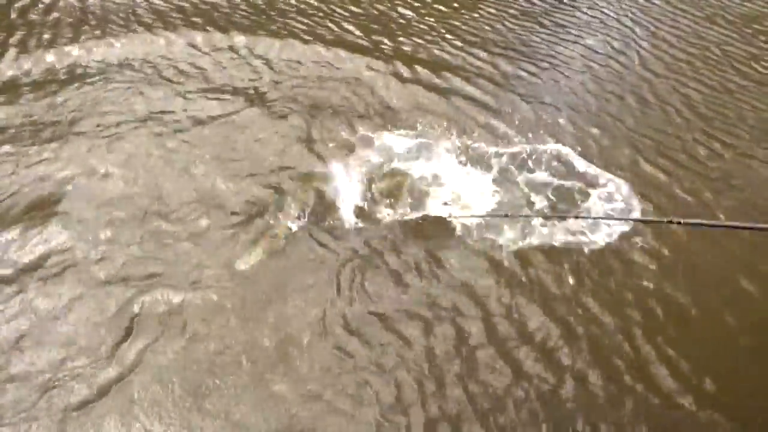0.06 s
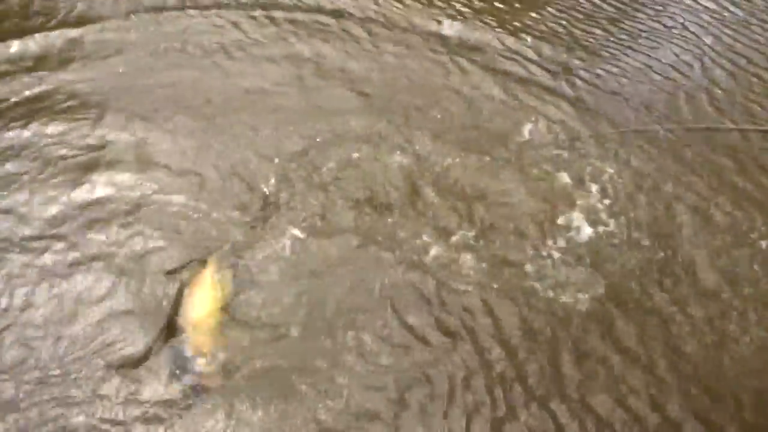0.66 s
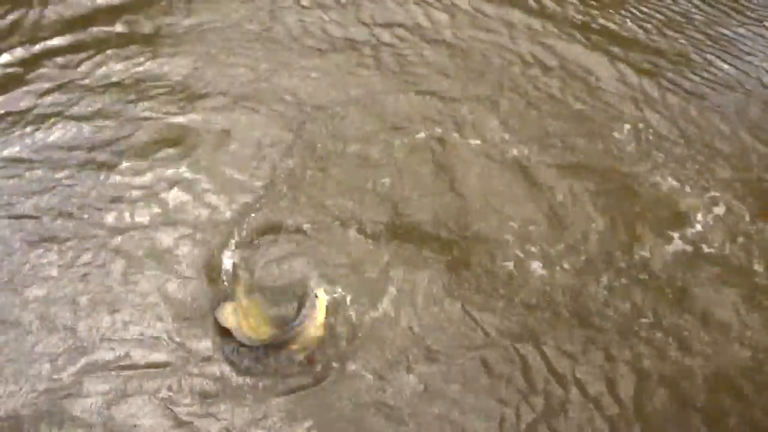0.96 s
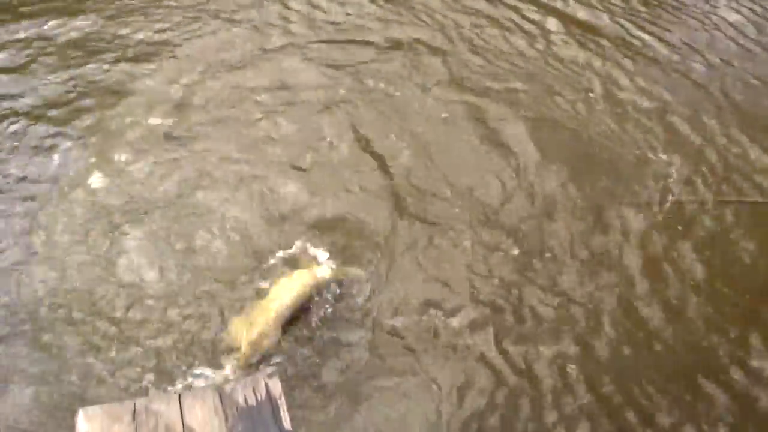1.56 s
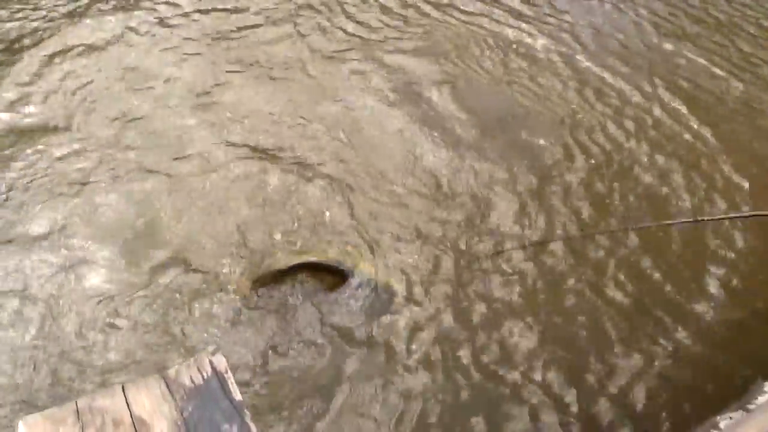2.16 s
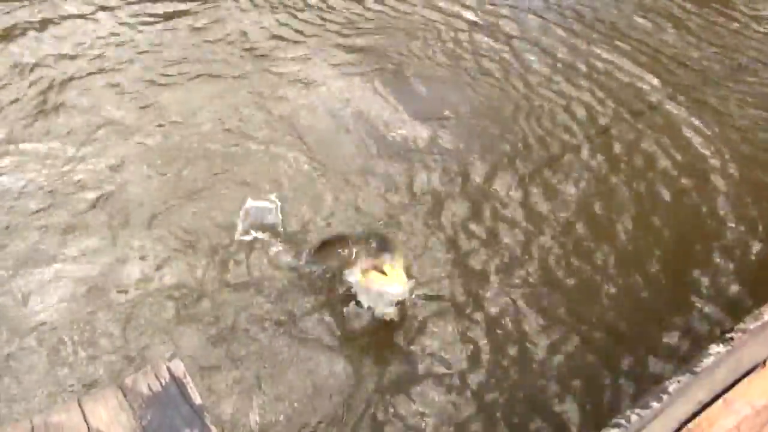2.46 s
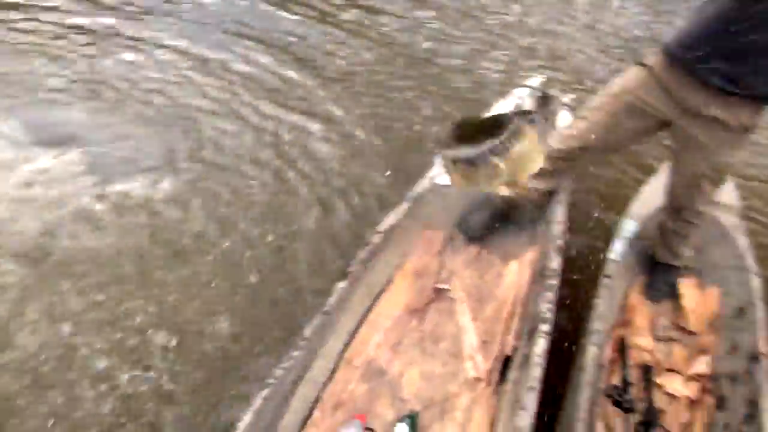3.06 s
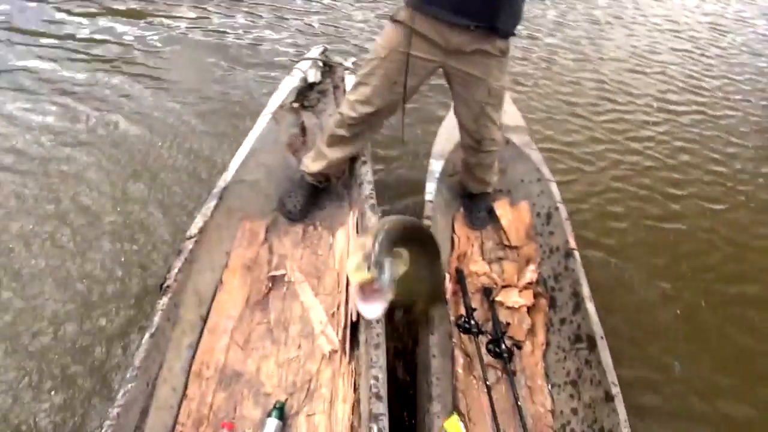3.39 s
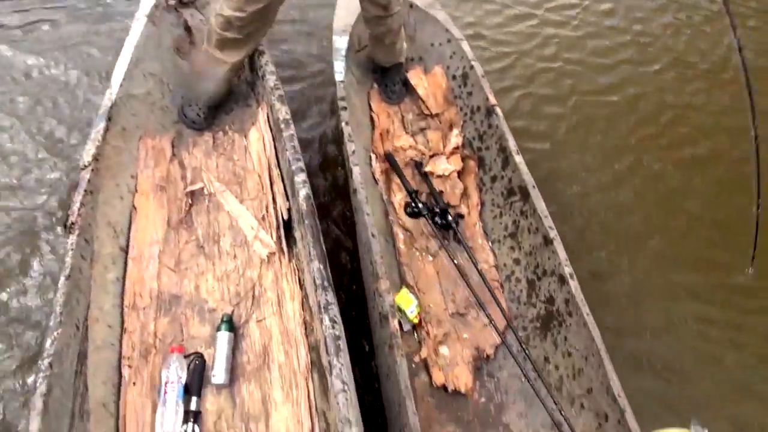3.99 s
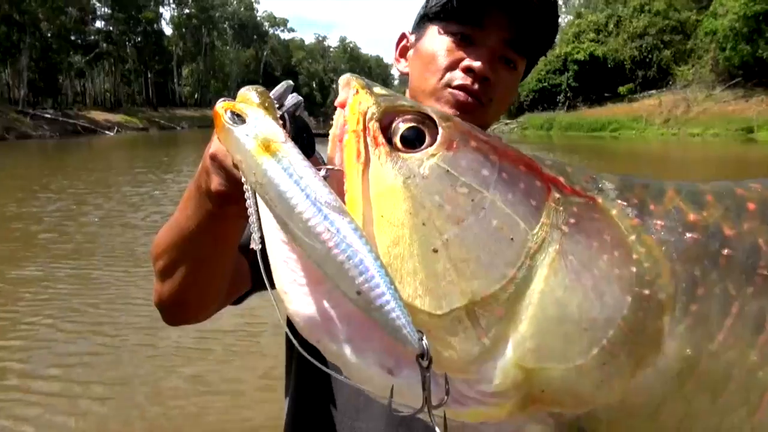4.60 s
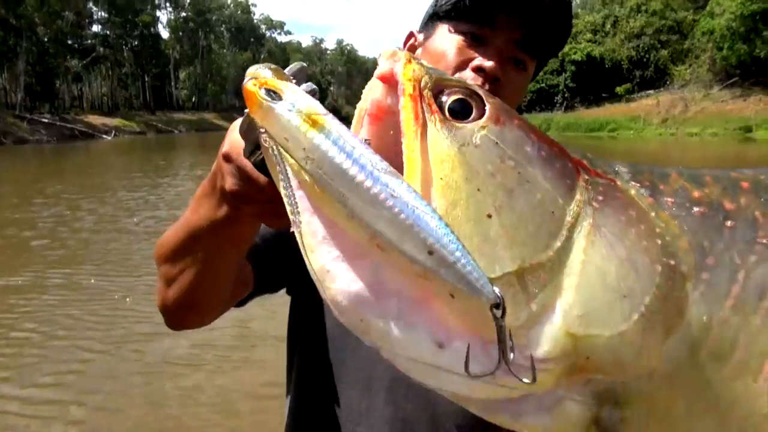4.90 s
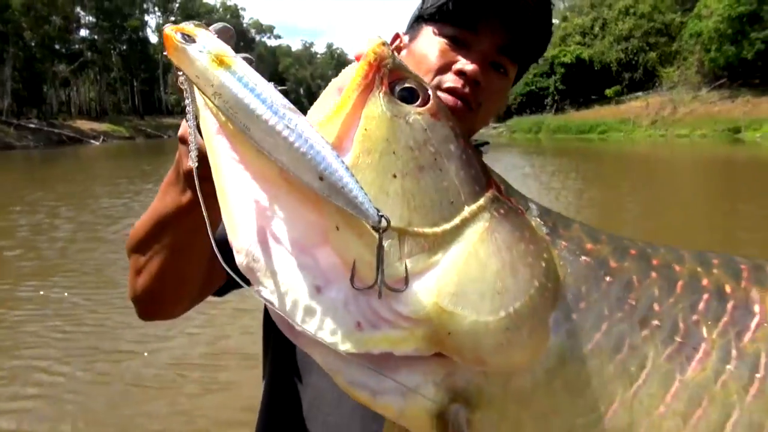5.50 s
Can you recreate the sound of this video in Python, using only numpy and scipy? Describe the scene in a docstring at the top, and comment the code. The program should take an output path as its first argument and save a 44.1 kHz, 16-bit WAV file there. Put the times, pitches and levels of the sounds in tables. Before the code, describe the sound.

A hooked fish thrashes at the surface of a river, close by, in uneven bursts of splashing, gurgling bubbles and pattering spray. Swung over two wooden canoes, it flaps quickly, flinging drops that smack sharply, and thuds against a hull. The sound then cuts abruptly to a very quiet river bank with a soft plop, two faint wet ticks and one distant bird chirp.

```python
"""On a river, beside two wooden canoes: a hooked fish thrashes at the surface. Its tail churns the water
into ringing bubbles and spray, and folds under pockets of air that gulp. Swung over the boats, it flaps,
flings drops that smack down nearby, and thuds into a hull, ringing the planks.
Then the sound cuts to a still river bank with one far bird chirp."""
import sys
import numpy as np
from scipy import signal
from scipy.fft import rfft, irfft
from scipy.io import wavfile

SR = 44100
rng = np.random.default_rng(int(sys.argv[2]) if len(sys.argv) > 2 else 0)


def dump_mix(stems):
    """Bounce the given channels to the path in sys.argv[1] as a 16-bit WAV at rate SR."""
    frames = np.atleast_2d(stems).T  # one column per channel
    limited = np.clip(frames, -1, 1)  # hard clip at full scale
    pcm = np.round(limited * 32767).astype(np.int16)
    wavfile.write(sys.argv[1], SR, pcm)


N = 253530
T = np.arange(N) / SR
AIRBORNE_S, CUT_S, END_S = 3.0, 4.514, 5.595   # fish lifted out, cut to the bank, silence
LEAD_S = .03   # water starts to squeeze out this long before a smack


# Tail strokes breaking the surface: t/s, level/dB, length/s, brightness/dB, slop send/dB
TAIL_STROKES = [(.02, -32, 0.65, -2, -14.5), (0.555, -42, 0.1, -2.5, -9), (0.883, -48.5, 0.31, -0.5, -9.5),
                (1.04, -42.5, 0.13, 3, -17), (1.14, -45, 0.2, 0.5, -6.5), (1.273, -39, 0.18, 3, -18),
                (1.47, -39.5, 0.24, -1, -5), (1.661, -43, 0.3, -4, -8), (1.908, -51.5, 0.19, -4, -19),
                (2.103, -54, 0.19, -3.5, -4), (2.45, -40.5, 0.097, 1, -14.5), (2.53, -39.5, 0.18, -4, -30),
                (2.681, -38.5, 0.27, -2, -12.5), (2.864, -36, .22, 1, -19.5)]

def strokes(offsets_db, lingers=1):
    """Envelope of water thrown up by the tail: it opens fast and falls back slowly at first."""
    return surges(TAIL_STROKES, offsets_db, lingers, rise_db_per_s=340, fall_shape=2.79)


# Wet flaps over the boats: t/s, level/dB, length/s, brightness/dB, hull rumble send/dB, slop send/dB (the water
# heaving as the canoes rock)
FISH_FLAPS = [(3.046, -37.5, 0.14, 3, -20, -12.5), (3.19, -38.5, 0.12, 7, -14.5, -17.5),
              (3.276, -44, 0.1, -1, -24, -5.5), (3.384, -43.5, 0.16, 0.5, -15, -11.5),
              (3.512, -35.5, .125, 1, -14, -27), (3.671, -38.5, 0.045, -1, -12.5, -15),
              (3.819, -43, 0.078, 0, -6.5, -28), (3.929, -32, .1, -1.5, -9.5, -27),
              (4.009, -41.5, 0.28, 1.5, -3, -15), (4.265, -39, 0.22, 2, -5, -27),
              (4.438, -32.5, 0.051, -3, -4.5, -20), (4.499, -32, 0.05, 1, -6.5, -25.5)]

def flaps(offsets_db, lingers=1):
    """Envelope of the fish flapping in the air: each flap holds its level, then stops short."""
    return surges(FISH_FLAPS, offsets_db, lingers, rise_db_per_s=621.5, fall_shape=4.1)


def agitation_db(register, lingers=1):
    """Level of all the moving water; brightness dips a negative register and lifts a positive one."""
    thrown = strokes([register * row[3] for row in TAIL_STROKES], lingers)
    shaken = flaps([register * row[3] for row in FISH_FLAPS], lingers)
    rest = from_db(np.where(T < AIRBORNE_S, -57, -51))   # lapping, then dripping
    return 10 * np.log10(thrown ** 2 + shaken ** 2 + rest ** 2)


# Fader on the gurgle's and splash's ringing bubbles, low once the fish is out: t/s, level/dB
BUBBLE_FADER = [(.5, -8), (.8, 1.5), (2.3, -0.5), (2.75, -3.5), (3.3, -8), (3.9, -18)]
# EQ curves of big bubbles, small bubbles and falling drops: f/Hz, level/dB
GURGLE_EQ = [(280, -12.5), (400, -16), (550, 0), (750, -5.5), (1100, -1.5), (1500, -4.5), (2100, -20)]
SPLASH_EQ = [(1000, -20), (1500, -3), (2200, 6), (3300, 5), (4400, -11), (6000, -20.5)]
SPRAY_EQ = [(3300, -19.5), (4600, 0.5), (6000, 1.5), (7500, -0.5), (9000, -8.5), (12000, -15), (15500, -36)]

def churn():
    """Broken water: big bubbles gurgle, small ones fizz, and falling drops patter on top."""
    gurgle_db = agitation_db(register=-1.2, lingers=1.038) - .74
    splash_db = agitation_db(register=0) + .35
    spray_db = agitation_db(register=.87) - .48
    bubbling = from_db(np.interp(T, *np.transpose(BUBBLE_FADER)))
    gurgle = from_db(-1) * patter(GURGLE_EQ, per_s=200, spread_db=3, smooth_db=-5.5, patchy_db=4.5)
    gurgle += bubbling * from_db(-4.5) * fizz(494, 1590, cycles=35, glide=.16, spread_db=9, count=800)
    splash = from_db(-2) * patter(SPLASH_EQ, per_s=220, spread_db=3.5, smooth_db=-.5, patchy_db=1.5)
    splash += bubbling * from_db(-1) * fizz(1494, 4260, cycles=33, glide=.09, spread_db=18.5, count=1100)
    spray = from_db(-.5) * patter(SPRAY_EQ, per_s=260, spread_db=-.5, smooth_db=-6, patchy_db=2.5)
    spray += from_db(-15.5) * fizz(4800, 9140, cycles=230, glide=.04, spread_db=20.5, count=1000)
    # each larger drop ticks across the whole treble at once
    ticks = butter(grains(per_s=290, spread_db=2), [1500, 7500], "band")
    drops = from_db((splash_db + spray_db) / 2 - 6) * rms_one(butter(ticks, 7900, "low"))
    # spray comes in clumps that start at once and thin out
    onsets = abs(grains(per_s=110, spread_db=3))
    clumps = rms_one(signal.lfilter([1], [1, -np.exp(-1 / (.007 * SR))], onsets))
    top_end = from_db(splash_db) * splash + from_db(spray_db) * spray
    return from_db(gurgle_db) * gurgle + rms_one(1.8 + clumps) * top_end + drops


def flung_drops():
    """Each stroke or flap throws a drop that lands while it lasts; rows as in WET_SMACKS."""
    drops = []
    for s, db, length_s, *_ in TAIL_STROKES + FISH_FLAPS:
        lands_s = s + .84 * length_s * rng.random()
        energy_db = db + 22 + rng.normal(0, 6)
        hz = 5600 * 2 ** rng.uniform(-.3, .3)
        drops.append((lands_s, energy_db, hz, -1.5))
    return drops


# Featured smacks of fish and flung water: t/s, energy/dB, centre f/Hz, spatter send/dB
WET_SMACKS = [(0.9629, -11.5, 5440, -6.5), (1.2884, -9.5, 3360, -9), (1.316, 4.5, 3300, 1),
              (1.478, -8.5, 5550, -8), (1.5147, -5.5, 3640, -4), (2.1223, -14.5, 5400, -6),
              (2.4406, -11.5, 4300, 2), (2.8157, -7, 6200, 0), (2.8944, -7.5, 2740, -1),
              (2.9399, -7, 5400, 5.5), (3.018, -7, 4900, -6.5), (3.0338, -0.5, 6950, 2),
              (3.0917, 4, 3100, -6), (3.1787, 3.5, 7050, -4), (3.202, -0.5, 7000, -5),
              (3.2649, -5, 5100, 8.5), (3.2843, -3, 7000, 2.5), (3.323, -4, 6860, -4),
              (3.3506, -2, 7700, -20), (3.3908, 2.5, 6800, -2), (3.4197, -8, 4670, 1),
              (3.4565, -1, 7220, -1.5), (3.5022, 1, 6170, 3.5), (3.607, -7, 4970, 0),
              (3.637, -15.5, 5300, 6), (3.6725, 4, 6400, -10), (3.9192, -6, 3450, -5),
              (3.9444, 0, 5260, 1.5), (3.984, -12, 4930, 3), (4.1684, -3.5, 6400, -2.5),
              (4.358, -11, 5350, -1), (4.372, -5.5, 6290, 7), (4.3849, 4.5, 6600, -5),
              (4.457, -6.5, 6970, 4), (4.4722, 3.5, 3300, -2)]

def smacks():
    """A sharp crack, with water squeezed out just before it, then a rebound and spatter."""
    out = np.zeros(N)
    for s, db, hz, spatter_db in WET_SMACKS + flung_drops():
        shatter = unit_energy(burst(before_db=-30, decay_s=.001, spread_db=4))
        crack = wet_colour(signal.unit_impulse(SR // 8, int(LEAD_S * SR)) + .5 * shatter, hz)
        spatter = wet_colour(burst(before_db=-12, decay_s=.0055, spread_db=6), hz)
        add(out, s - LEAD_S, from_db(db) * (crack + from_db(spatter_db) * spatter))
        rebound_s = s + .0059 * rng.uniform(.8, 1.2)
        add(out, rebound_s - LEAD_S, from_db(db + spatter_db - 6.5) * wet_colour(shatter, hz))
    return out


# Large air pockets: t/s, f/Hz, relative level/dB, t60/s, glide/(share of f per s)
AIR_POCKETS = [(.011, 564, -16, 0.014, 25), (.057, 900, -16.5, 0.028, 8), (.061, 465, -16.5, 0.03, -7),
               (.145, 940, -16.5, 0.063, 2.5), (0.513, 503, -19, 0.011, 14), (.889, 1970, -35, 0.053, 24),
               (.981, 1205, -26.5, 0.025, -10), (1.068, 1360, -20.5, 0.031, 11.5),
               (1.091, 489, -39.5, 0.24, 2.5), (1.477, 1170, -23, 0.016, 3), (1.513, 585, -20, 0.043, -1),
               (1.515, 177, -34, 0.087, -4.5), (1.551, 1100, -20.5, 0.013, -1),
               (1.691, 251, -31.5, 0.1, -2.5), (1.711, 498, -30, 0.067, 6.5),
               (1.744, 236.5, -38.5, 0.25, 5), (1.872, 575, -35.5, 0.066, -1.5),
               (1.928, 569, -30, 0.1, 9.5), (2.042, 584, -43, 0.14, 5.5), (2.486, 614, -29.5, 0.045, -1),
               (2.546, 910, -29.5, 0.091, 0.5), (2.595, 560, -26, 0.036, -4), (2.652, 1130, -22, 0.017, 2),
               (2.837, 536, -31, 0.082, 19.5)]

def gulps():
    """The fish folds large pockets of air under the surface, and each rings with a bending pitch."""
    out = np.zeros(N)
    for s, hz, db, t60, glide in AIR_POCKETS:
        add(out, s, from_db(db + 4) * ping(hz, t60, glide, onset_s=.0011))
    return out


# Blows on the hull: t/s, relative level/dB, centre f/Hz, contact/s
HULL_BLOWS = [(2.733, -34, 190, .0066), (3.092, -11.5, 1010, 0.0053), (3.098, -20, 1460, 0.0038),
              (3.199, -35.5, 260, .004), (3.499, -22.5, 1410, .015), (3.549, -21, 905, .01),
              (3.667, -28.5, 1150, .0052), (3.834, -29, 404, .019), (4.077, -32, 240, 0.0063),
              (4.096, -26.5, 143, .0085), (4.433, -15.5, 1780, .003), (4.4402, -8, 857, .0045),
              (4.445, -10.5, 334, .003), (4.492, -25, 1497, 0.0036)]
# Resonances of the wooden hull: f/Hz, relative level/dB, t60/s
HULL_MODES = [(145, -15.5, 0.17), (250, 0, 0.051), (313, -1.5, 0.1), (541.5, -5.5, .035), (720, 3, 0.072),
              (860, -17.5, 0.044), (1023, -4, .03), (1124, 1, .04), (1520, -11, .025), (1810, 7, 0.024),
              (2450, -6, 0.024), (2880, 2.5, 0.078)]

def hull():
    """Blows ring the planks, most of all near each blow's centre pitch; flaps make them rumble."""
    knocks = np.zeros(N)
    t = T[:SR // 5]
    for s, db, centre_hz, contact_s in HULL_BLOWS:
        push = np.exp(-t / contact_s) * rng.standard_normal(len(t))
        thud = unit_energy(butter(push, [centre_hz / 3, centre_hz * 2.7], "band"))
        add(knocks, s, from_db(db + 18.5) * thud)
        for k, (hz, mode_db, t60) in enumerate(HULL_MODES):
            reach_db = mode_db - 4 * np.log2(hz / centre_hz) ** 2 - 5.5 + rng.normal(0, 1.5)
            add(knocks, s, from_db(db + reach_db) * (-1) ** k * ping(hz, t60, 0, onset_s=contact_s / 4))
    boom = 0
    for hz, mode_db, t60 in HULL_MODES:
        tilt_db = -7 * np.log2(hz / HULL_MODES[0][0])
        boom += from_db(mode_db + tilt_db) * ring(grains(per_s=260, spread_db=-2.5), hz, t60)
    rumble = flaps([row[4] for row in FISH_FLAPS]) * from_db(.5) * rms_one(boom)
    return butter(knocks + rumble, 115, "high", order=3)   # thin planks radiate little bass


# EQ curve of the water's low end: f/Hz, level/dB
SLOP_EQ = [(25, -13.5), (45, -2), (70, 0.5), (130, 0), (220, -4.5), (330, -9.5), (500, -24.5)]

def slop():
    """The low heave of the water, swelling with each stroke and as the canoes rock, and outlasting it."""
    low_end = patter(SLOP_EQ, per_s=60, spread_db=3, smooth_db=-1, patchy_db=2)
    pushed = strokes([row[4] for row in TAIL_STROKES], lingers=1.4)
    rocked = flaps([row[5] for row in FISH_FLAPS], lingers=1.4)
    lapping = from_db(-67)
    return np.sqrt(pushed ** 2 + rocked ** 2 + lapping ** 2) * low_end


def bird():
    """One far, falling chirp and its echo off the trees."""
    pitch_hz = np.interp(T, [4.915, 4.955], [3400, 2200]) * (1 + .06 * drift(239))
    swell = np.interp(T, [4.912, 4.922, 4.96], [0, 1, 0])
    chirp = from_db(-62.5) * swell * np.sin(2 * np.pi * np.cumsum(pitch_hz) / SR)
    add(chirp, .07, from_db(-11) * chirp)
    return chirp


# EQ curve of the air over the river: f/Hz, level/dB
AIR_EQ = [(18, -41.5), (30, -5), (239, 0), (273, -3.5), (355, -3), (415, -1), (540, -8), (760, -10),
          (1100, -7), (3220, -11.5), (3580, -11), (13000, -18.5), (16000, -33.5)]

def bank():
    """A bed of still air with one soft plop and two faint wet ticks."""
    white = rfft(rng.standard_normal(N))
    hz = np.maximum(np.arange(len(white)) * SR / N, 1)
    out = from_db(-69.5) * rms_one(irfft(white * from_db(at_hz(AIR_EQ, hz)), N))
    add(out, 4.552, from_db(-46.5) * ping(425, t60=.039, glide=0, onset_s=.00079))
    for s, db, tick_hz in [(4.954, -41, 6400), (5.115, -46, 4180)]:
        tick = wet_colour(burst(before_db=-20, decay_s=.0018, spread_db=5), tick_hz)
        add(out, s - LEAD_S, from_db(db) * tick)
    return out


def surges(rows, offsets_db, lingers, rise_db_per_s, fall_shape):
    """Joint envelope of movements: each swells, then is 20 dB down after `lingers` times its length."""
    t, power = T[::32], 1e-12
    for (s, db, length_s, *_), offset_db in zip(rows, offsets_db):
        swell_db = rise_db_per_s * np.minimum(t - s, 0)
        fall_db = 20 * (np.maximum(t - s, 0) / (length_s * lingers)) ** fall_shape
        power += from_db(db + offset_db + swell_db - fall_db) ** 2
    return np.interp(T, t, np.sqrt(power))


def patter(eq, per_s, spread_db, smooth_db, patchy_db):
    """Roughly third-octave bands, each rung by its own drops over a blur of finer ones; rms 1."""
    out, low, high = 0, eq[0][0], eq[-1][0]
    edges = np.geomspace(low, high, int(3 * np.log2(high / low)) + 2)
    for a, b in zip(edges, edges[1:]):
        drive = grains(per_s, spread_db) + from_db(smooth_db) * rng.standard_normal(N)
        band_db = at_hz(eq, np.sqrt(a * b)) + patchy_db * drift(19)
        out += butter(drive, [a, b], "band") * from_db(band_db)
    return rms_one(out)


def fizz(low_hz, high_hz, cycles, glide, spread_db, count):
    """A swarm of ringing bubbles, each climbing in pitch as it nears the surface; rms 1."""
    out = np.zeros(N)
    for when, size, strength, life, climb in rng.random((count, 5)):
        hz = low_hz * (high_hz / low_hz) ** size
        t60 = cycles * (.5 + life) / hz
        bubble = ping(hz, t60, glide * climb / t60, onset_s=.5 / hz)
        add(out, when * T[-1], from_db(spread_db * strength ** 2) * bubble)
    return rms_one(out)


def ping(hz, t60, glide, onset_s):
    """A bubble or plank ringing out: a damped sine whose pitch moves by `glide` times hz per second."""
    t = T[:int(t60 * SR)]
    envelope = (1 - np.exp(-t / onset_s)) * np.exp(-np.log(1000) * t / t60)
    return envelope * np.sin(2 * np.pi * hz * (t + glide * t * t / 2))


def burst(before_db, decay_s, spread_db):
    """A clump of tiny impacts: faint up to the moment of contact, then full and dying away."""
    t = T[:SR // 8] - LEAD_S
    impacts = rng.choice([-1, 1], len(t)) * from_db(spread_db * np.minimum(rng.exponential(1, len(t)), 3))
    return impacts * np.exp(-abs(t) / decay_s) * from_db(before_db * (t < 0))


def wet_colour(hit, hz):
    """An impact rings the small pocket of air it traps, over a broader splat; energy 1."""
    pocket = unit_energy(butter(hit, [hz / 1.127, hz * 1.125], "band", order=1))
    splat = unit_energy(butter(hit, [hz / 5, hz * 2.2], "band"))
    return unit_energy(butter(pocket + from_db(-2.5) * splat, 9800, "low", order=3))


def grains(per_s, spread_db):
    """Random clicks of uneven size; rms 1."""
    sizes = from_db(spread_db * np.minimum(rng.exponential(1, N), 4))
    return rms_one((rng.random(N) < per_s / SR) * sizes * rng.choice([-1, 1], N))


def ring(clicks, hz, t60):
    """A resonator: each click sets a sine ringing."""
    r, w = np.exp(-np.log(1000) / (t60 * SR)), 2 * np.pi * hz / SR
    return signal.lfilter([0, np.sin(w)], [1, -2 * r * np.cos(w), r * r], clicks + 1e-18)


def drift(rate_hz):
    """A smooth random wobble; rms 1."""
    r = np.exp(-80 * np.pi * rate_hz / SR)
    slow = signal.lfilter([1], [1, -2 * r, r * r], rng.standard_normal(N // 40 + 2002))[2000:]
    return np.interp(np.arange(N) / 40, np.arange(len(slow)), rms_one(slow))


def butter(x, hz, kind, order=2):
    """A causal Butterworth filter."""
    sections = signal.butter(order, np.clip(hz, 10, .47 * SR), kind, fs=SR, output="sos")
    return signal.sosfilt(sections, x + 1e-18)


def at_hz(eq, hz):
    """An EQ curve read on a log-frequency axis."""
    points_hz, points_db = np.transpose(eq)
    return np.interp(np.log(hz), np.log(points_hz), points_db)


def add(out, s, sound):
    """Mix a sound in at s seconds."""
    at = int(np.clip(round(s * SR), 0, N - 1))
    out[at:at + len(sound)] += sound[:N - at]


def from_db(db):
    return 10 ** (np.asarray(db) / 20)


def rms_one(x):
    return x / np.sqrt(np.mean(x ** 2) + 1e-20)


def unit_energy(x):
    return x / np.sqrt(np.sum(x ** 2) + 1e-20)


def scene():
    """The fight with the fish, cut hard to leave the quiet bank that lies under it; mono."""
    fight = churn() + slop() + gulps() + smacks() + hull()
    ambience = bank() + bird()
    return (fight * (T < CUT_S) + ambience * (T < END_S))[None]


def record(dry):
    """Soft clipping rounds the peaks, and a steep low-pass cuts the top at 16 kHz."""
    return signal.sosfilt(signal.ellip(10, .1, 80, 16000, fs=SR, output="sos"), np.tanh(dry))


dry = scene()
out = record(dry)
dump_mix(out)
```